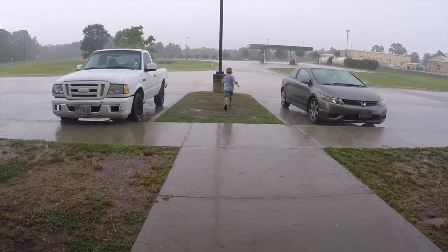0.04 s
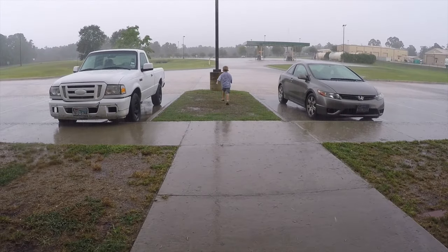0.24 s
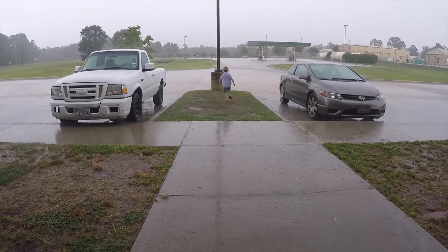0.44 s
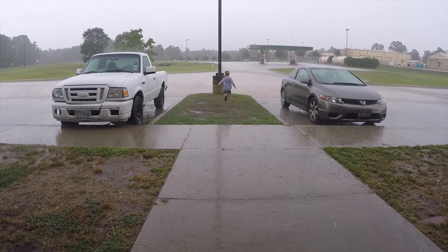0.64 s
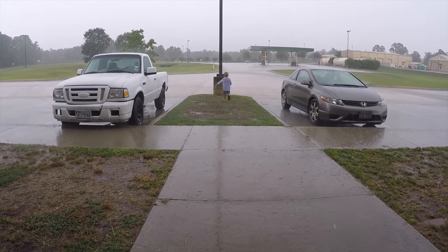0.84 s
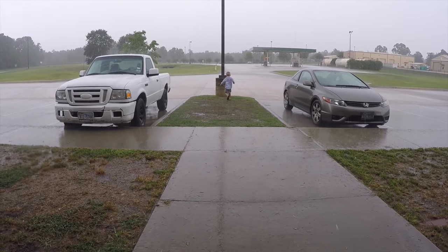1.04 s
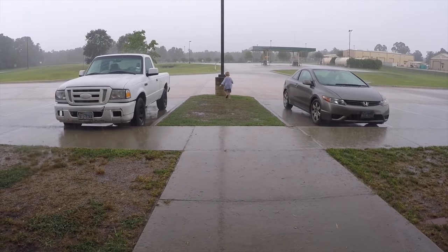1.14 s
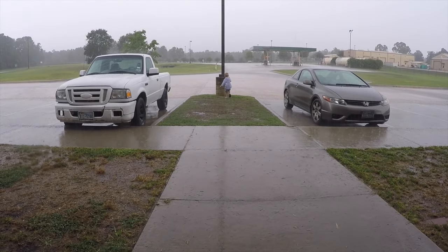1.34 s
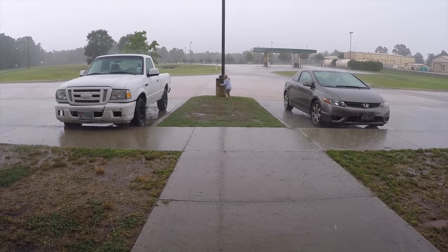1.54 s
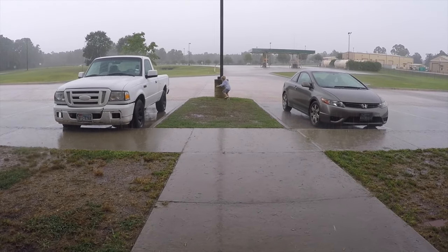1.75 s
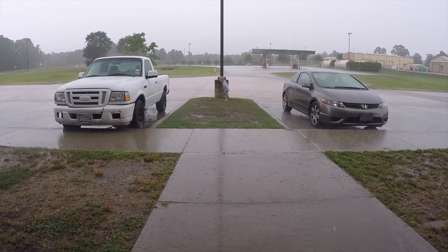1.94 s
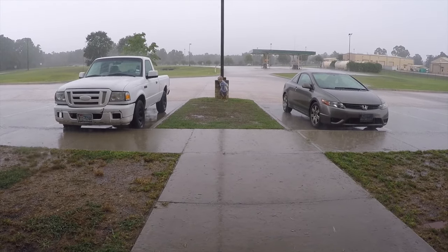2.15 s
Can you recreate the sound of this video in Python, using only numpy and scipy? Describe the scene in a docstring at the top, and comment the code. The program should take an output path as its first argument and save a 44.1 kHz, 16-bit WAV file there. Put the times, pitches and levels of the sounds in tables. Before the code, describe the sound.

A door shuts with a low thump and a latch click in steady rain.

```python
"""A door shuts in the rain.

Outdoors, one microphone, steady rain on pavement and grass. Early on a door is pushed shut with a low
thump and a soft hiss: it brushes its seal, hits the frame with a brief squeak, shudders, and the latch
clicks home. A few fat drops splash close by, small ones patter on the pavement, and far drops blend
into a wash over the low rumble of the open air."""
import sys
import numpy as np
from scipy import signal
from scipy.fft import rfft, irfft, next_fast_len
from scipy.io import wavfile
from scipy.ndimage import map_coordinates

SR = 44100
rng = np.random.default_rng(int(sys.argv[2]) if len(sys.argv) > 2 else 0)


def wav_out(sig):
    """Save sig, one row per channel (or a flat mono array), as 16-bit PCM at SR to the path in sys.argv[1]."""
    wavfile.write(sys.argv[1], SR, np.round(np.clip(np.atleast_2d(sig).T, -1, 1) * 32767).astype(np.int16))


N = 97020  # 2.2 s

# the door meets its frame and rebounds (time [s], level [dB])
DOOR_BLOWS = [(0.180, -12), (0.214, -24), (0.245, -26.5), (0.316, -36.5)]
# the door panel's modes (frequency [Hz], relative level [dB], t60 [s], rise [s])
PANEL_MODES = [(65.4, -18, 0.19, 0.0052), (85, -5.5, 0.059, 0.0044), (119.3, -1, .12, .003),
               (154.4, -0.5, 0.13, 0.0033), (183.5, -1.5, 0.12, 0.0021), (211.6, -14.5, 0.39, 0.0024),
               (247, -13, 0.078, 0.0039), (330.3, -5.5, 0.1, 0.018), (359.3, -15, 0.21, 0.0163),
               (502, -20, 0.096, 0.0043)]
# air pushed ahead of the swinging door (frequency [Hz], relative level [dB])
DRAUGHT_SPECTRUM = [(30, -19), (70, 10.5), (180, 1.5), (330, -1.5), (550, -10.5), (1000, -20.5),
                    (3000, -50.5)]
# the frame shuddering after the blow (frequency [Hz], relative level [dB])
SHUDDER_SPECTRUM = [(25, -19), (45, 0.5), (70, -18), (125, -9), (160, -19), (210, -8), (280, -22),
                    (500, -38), (1200, -27.5), (3000, -57)]
# strokes of the seal along the frame (time [s], level [dB], fall [s])
SEAL_STROKES = [(0.123, -49, 0.013), (0.151, -48.5, .012), (0.192, -40.5, 0.013), (0.250, -53.5, 0.0089),
                (0.300, -49, 0.029), (0.3362, -42, 0.0058), (0.354, -48, 0.015)]
# the seal's scuff, also the latch's crack (frequency [Hz], relative level [dB])
CONTACT_SPECTRUM = [(150, -16), (500, 4.5), (1000, -1.5), (1700, -4.5), (2400, 1), (3300, -2), (4800, -4.5),
                    (6500, -16), (10000, -24), (15000, -42)]
# the bolt touches the strike plate, slides over it, snaps home (time [s], level [dB], centre [Hz])
BOLT_CONTACTS = [(0.1413, -37, 2280), (0.1915, -34.5, 3180), (0.3421, -30.5, 4460)]
# the latch's modes (frequency [Hz], relative level [dB], t60 [s])
LATCH_MODES = [(1400, 4, .04), (2376, -7.5, 0.086), (2980, -5.5, 0.061), (3450, -12.5, 0.029),
               (4190, -3.5, 0.044), (4410, 0, 0.028), (4660, -12, 0.026)]
# soft hiss around the thump (frequency [Hz], relative level [dB])
HISS_SPECTRUM = [(300, 8.5), (1500, -3), (3000, -1), (6000, -3.5), (10000, -15), (15000, -19)]
# fat drops near the microphone (time [s], level [dB], centre [Hz], width [octaves], rise [s])
CLOSE_DROPS = [(0.001, -40, 2640, 1, .002), (0.510, -34, 2630, 0.75, 0.0067),
               (0.578, -43, 3000, 0.49, 0.0031), (0.6583, -45, 4250, 0.74, 0.00023),
               (0.673, -37.5, 3100, .6, 0.0034), (0.741, -40.5, 3800, .5, 0.0042),
               (0.917, -46, 4900, 0.55, .001), (1.0792, -38.5, 4670, 0.2, 0.0018),
               (1.0812, -47.5, 9200, .2, .0004), (1.1045, -51.5, 9500, 0.48, 0.00068),
               (1.1093, -41.5, 4300, 0.64, 0.00085), (1.168, -50, 7000, 0.53, .0005),
               (1.286, -47, 3960, 0.61, 0.0022), (1.440, -45.5, 2930, 0.17, .002),
               (1.570, -48, 9000, .5, .0003), (1.629, -45, 3580, 0.45, 0.00081),
               (2.024, -46, 3640, 0.36, 0.0018), (2.04, -37.5, 5360, 0.5, 0.0062),
               (2.106, -44, 5000, 0.81, 0.004)]
# small drops on the pavement (frequency [Hz], relative level [dB])
PATTER_SPECTRUM = [(300, -35), (1200, 2.5), (3000, 2), (4500, 4), (8000, -4.5), (15000, -15.5)]
# rain in the distance (frequency [Hz], relative level [dB])
WASH_SPECTRUM = [(100, -47), (400, -3.5), (700, 0), (1600, -3.5), (3000, -3.5), (4400, -5), (7000, -12.5),
                 (10000, -19.5), (15000, -38)]
# low outdoor rumble (frequency [Hz], relative level [dB])
RUMBLE_SPECTRUM = [(20, -35), (35, -20), (55, -5), (100, -5), (160, -1.5), (215, -2), (280, -5), (370, -5),
                   (600, -9), (1500, -28.5)]


def door(push_hz=107, push_s=0.017):
    """A draught leads; each blow heaves the panel once and rings its modes; the frame shudders on."""
    out = amp(-37) * swell(0.169, rise=0.041, fall=0.098) * noise(DRAUGHT_SPECTRUM)
    for at, db in DOOR_BLOWS:
        t = since(at)
        ring = sum(amp(level) * fade(t, t60, rise) * np.sin(2 * np.pi * hz * t)
                   for hz, level, t60, rise in PANEL_MODES)
        heave = np.sin(np.pi * np.minimum(t / push_s, 1)) * np.sin(2 * np.pi * push_hz * t)
        out += amp(db) * (ring + amp(0.5) * heave)
    t = since(DOOR_BLOWS[0][0])
    shudder = amp(-32) * fade(t, t60=0.39, rise=0.0098)
    echo = amp(-48) * fade(t, t60=1.56, rise=0.018)  # faint and low, off the buildings
    return out + (shudder + echo) * noise(SHUDDER_SPECTRUM)


def seal(grain_db=2.5, squeak_hz=1192, squeak_length_s=0.0353):
    """The seal scuffs along the frame and squeaks as it is squeezed."""
    strokes = sum(amp(db) * swell(at, fall / 2, fall) for at, db, fall in SEAL_STROKES)
    friction = amp(grain_db * wobble(600)) * rng.standard_normal(N)
    scuff = strokes * coloured(friction, CONTACT_SPECTRUM)
    progress = np.minimum(since(0.179) / squeak_length_s, 1)
    squeeze = np.tanh(4 * np.sin(np.pi * progress))
    pitch = squeak_hz * (1 + 0.029 * wobble(218.9))
    return scuff + amp(-38) * squeeze * np.sin(2 * np.pi * np.cumsum(pitch) / SR)


def latch():
    """Each contact of the bolt cracks and rings briefly; the harder the contact, the higher the ring."""
    out = np.zeros(N)
    for at, db, centre in BOLT_CONTACTS:
        t = since(at)
        ring = np.zeros(N)
        for hz, level, t60 in LATCH_MODES:
            strength = amp(level) * band(hz, centre, octaves=0.5)
            phase = 2 * np.pi * hz * t + 0.5 * wobble(300)
            ring += strength * fade(t, t60, rise=0.00075) * np.sin(phase)
        crack = amp(-5.5) * fade(t, t60=0.012, rise=0.00026) * noise(CONTACT_SPECTRUM)
        out += amp(db) * (ring + crack)
    return out


def hiss():
    """A soft hiss rises with the thump and sinks back into the rain."""
    return amp(-49.5) * swell(0.27, rise=0.15, fall=0.32) * noise(HISS_SPECTRUM)


def splashes(grain_db=3):
    """Close to the microphone, fat drops smack and throw a grainy spray; those on grass rise softly."""
    out = np.zeros(N)
    for at, db, centre, width, rise in CLOSE_DROPS:
        t = since(at)
        smack = fade(t, t60=0.013, rise=rise)
        spray = amp(-12 + grain_db * wobble(500)) * fade(t, t60=0.17, rise=rise)
        water = filtered(rng.standard_normal(N), lambda hz: band(hz, centre, width) / np.sqrt(hz + 1))
        out += amp(db) * (smack + spray) * unit(water)
    return out


def patter(drops_per_s=420, spread_db=6, decay_s=0.00034, count=3000):
    """Small drops hit the nearby pavement in light flurries, each a tiny burst of its own size."""
    flurries = amp(-63.5 + 0.9 * wobble(15))
    landings = (np.cumsum(rng.exponential(1, count)) / drops_per_s * SR).astype(int)
    sizes = amp(spread_db * np.minimum(rng.standard_normal(count), 2))
    heard = landings < N
    impacts = np.bincount(landings[heard], sizes[heard] ** 2, N)
    power = signal.lfilter([1], [1, -np.exp(-2 / (decay_s * SR))], impacts)  # each impact dies away
    return flurries * coloured(np.sqrt(power) * rng.standard_normal(N), PATTER_SPECTRUM)


def far_rain(flutter_db=1.0):
    """Far from the microphone, countless drops merge into a gently fluttering wash."""
    return amp(-55.5 + flutter_db * wobble(21.97)) * noise(WASH_SPECTRUM)


def rumble(flutter_db=0.07):
    """The open air rumbles low and almost level behind everything."""
    return amp(-54.5 - flutter_db * wobble(7.9)) * noise(RUMBLE_SPECTRUM)


def amp(db):
    """Decibels to gain."""
    return 10 ** (np.asarray(db) / 20)


def unit(x):
    """Scale to rms 1."""
    return x / np.sqrt(np.mean(x ** 2) + 1e-20)


def since(at):
    """Seconds since a moment, zero before it."""
    return np.maximum(np.arange(N) / SR - at, 0)


def fade(t, t60, rise):
    """A rise and an exponential decay of 60 dB in t60 seconds."""
    return amp(-60 * t / t60) * (1 - np.exp(-t / rise))


def swell(at, rise, fall):
    """A bell-shaped swell that peaks at a moment; all times in seconds."""
    t = np.arange(N) / SR - at
    return np.exp(-(t / np.where(t < 0, rise, fall)) ** 2)


def wobble(rate):
    """A smooth random curve, rate knots a second."""
    return map_coordinates(rng.standard_normal(2048), [np.arange(N) * rate / SR], mode="mirror")


def band(hz, centre, octaves):
    """A bell of gain around a centre frequency."""
    return np.exp(-0.5 * (np.log2((hz + 1) / centre) / octaves) ** 2)


def filtered(x, response):
    """Filter x by a gain that depends on frequency."""
    size = next_fast_len(N + 8192)
    return irfft(rfft(x, size) * response(np.fft.rfftfreq(size, 1 / SR)), size)[:N]


def coloured(x, spectrum):
    """Shape x by (frequency [Hz], level [dB]) points, at rms 1."""
    freqs, db = np.transpose(spectrum)
    return unit(filtered(x, lambda hz: amp(np.interp(np.log(hz + 1), np.log(freqs), db))))


def noise(spectrum):
    """Noise of a given colour, at rms 1."""
    return coloured(rng.standard_normal(N), spectrum)


def scene():
    """From one spot outdoors, in mono: rain near and far all through, the door near the start."""
    weather = far_rain() + rumble() + patter() + splashes()
    return (weather + door() + seal() + latch() + hiss())[None]


def record(dry, low_cut_hz=38, treble_hz=13700, top_hz=15300):
    """Microphone and recorder drop the deepest bass, dull the treble and pass nothing above top_hz."""
    low_cut = signal.butter(3, low_cut_hz, "highpass", fs=SR, output="sos")
    trimmed = signal.sosfilt(low_cut, dry[0])
    return filtered(trimmed, lambda hz: (hz < top_hz) / np.sqrt(1 + (hz / treble_hz) ** 10))[None]


dry = scene()
out = record(dry)
wav_out(out)
```